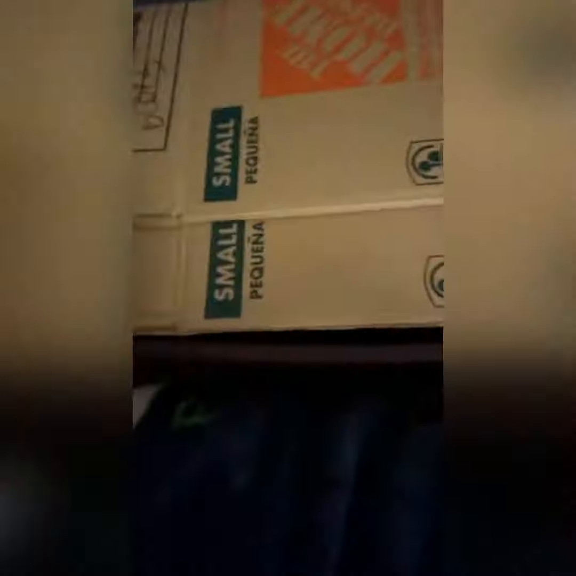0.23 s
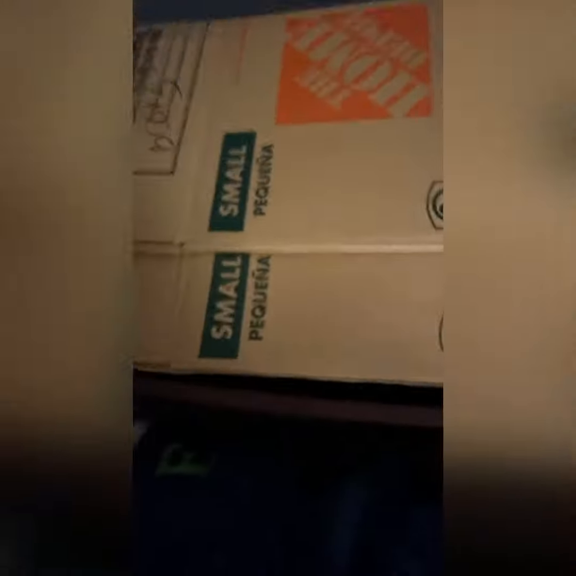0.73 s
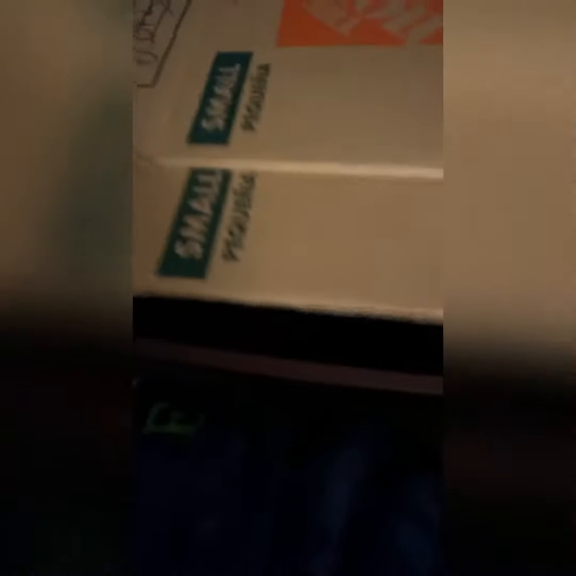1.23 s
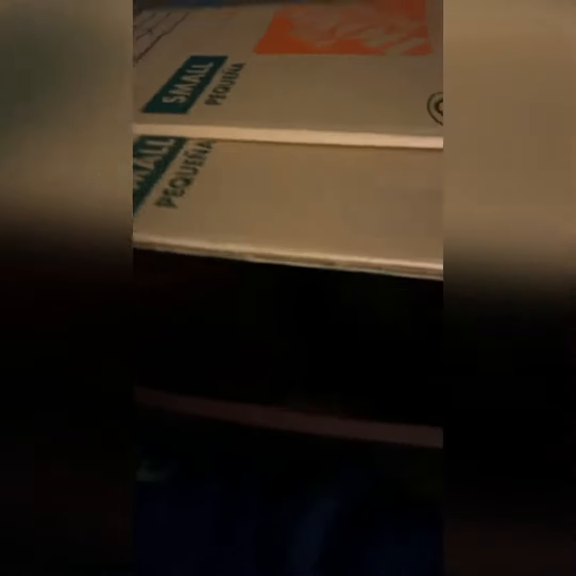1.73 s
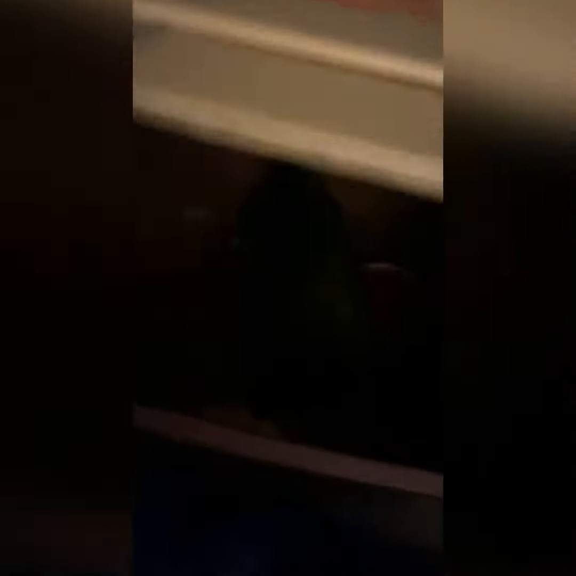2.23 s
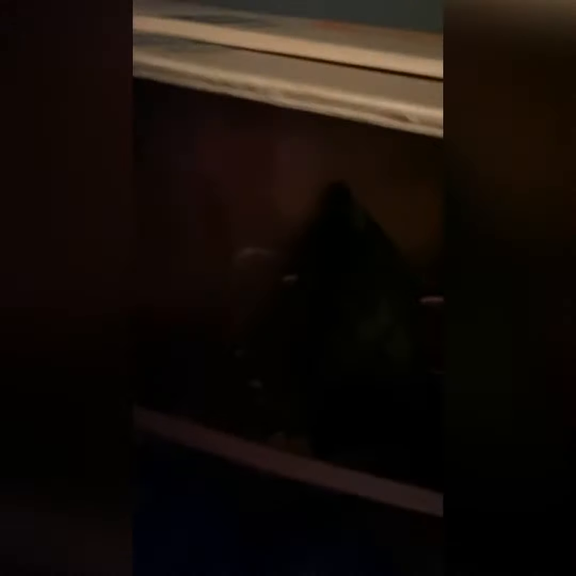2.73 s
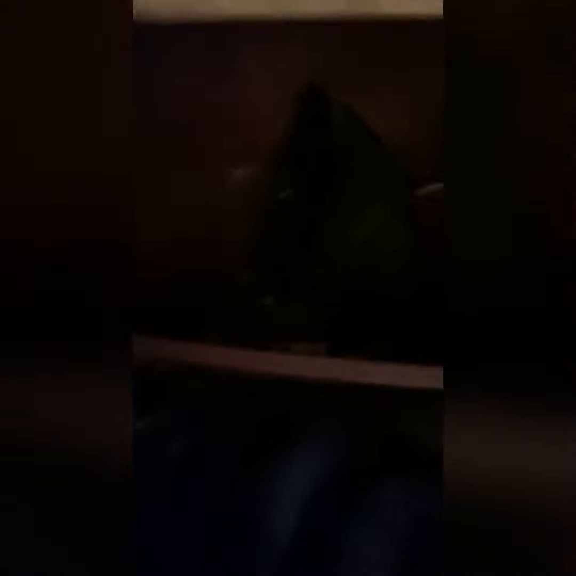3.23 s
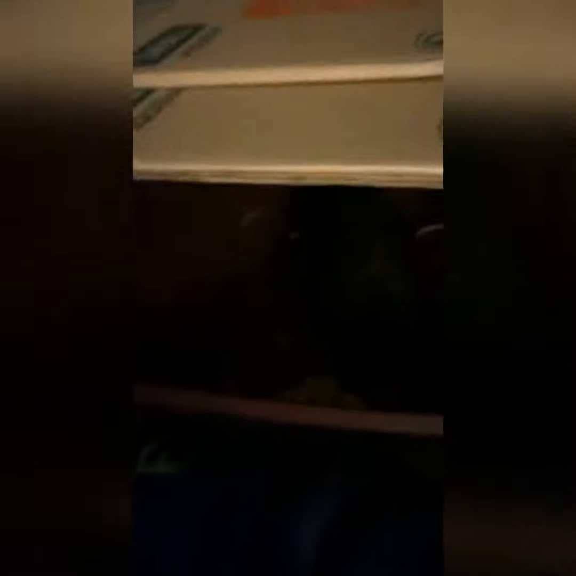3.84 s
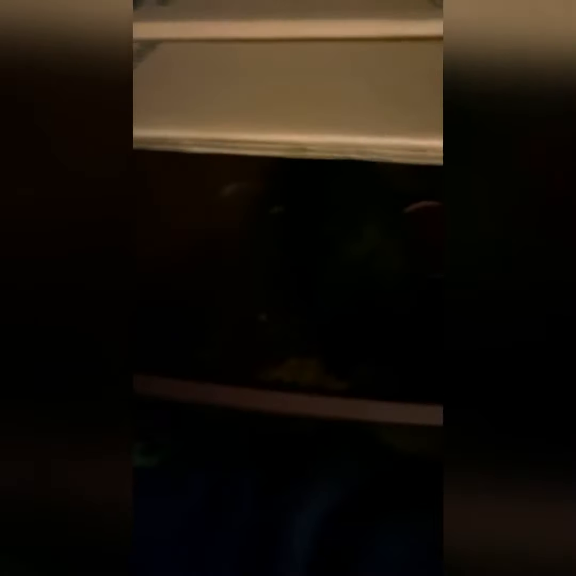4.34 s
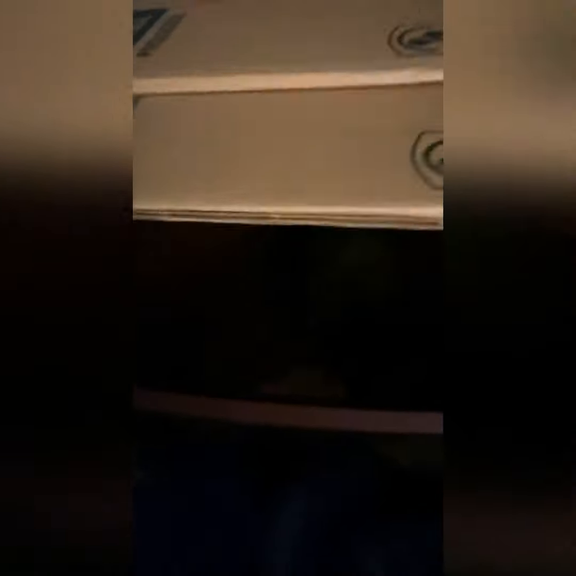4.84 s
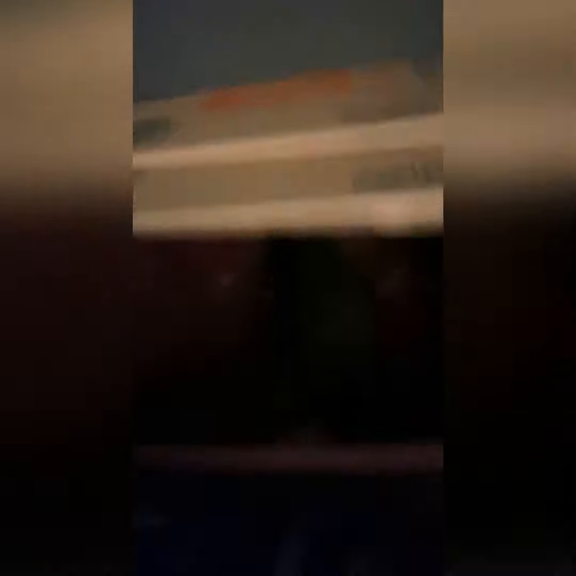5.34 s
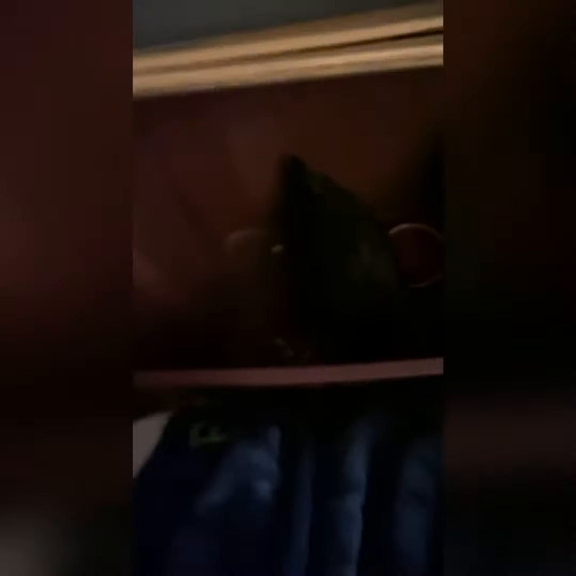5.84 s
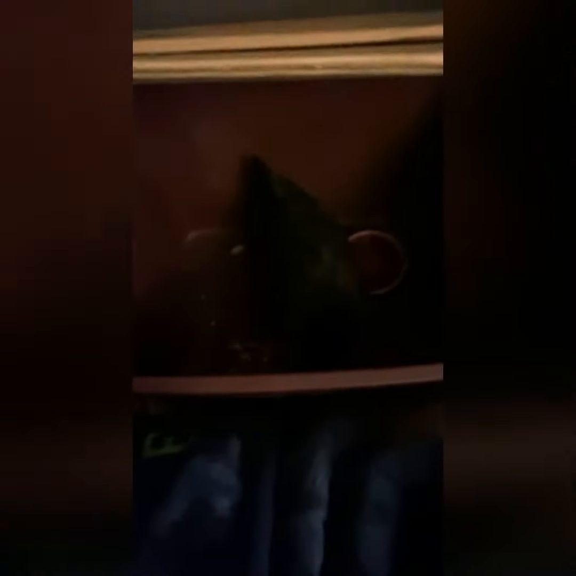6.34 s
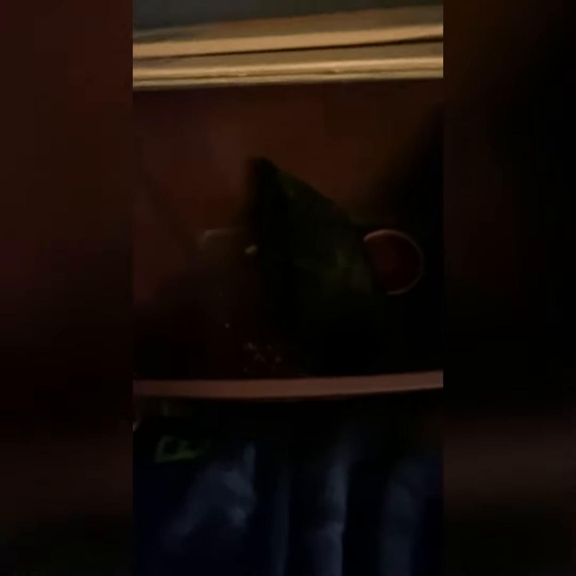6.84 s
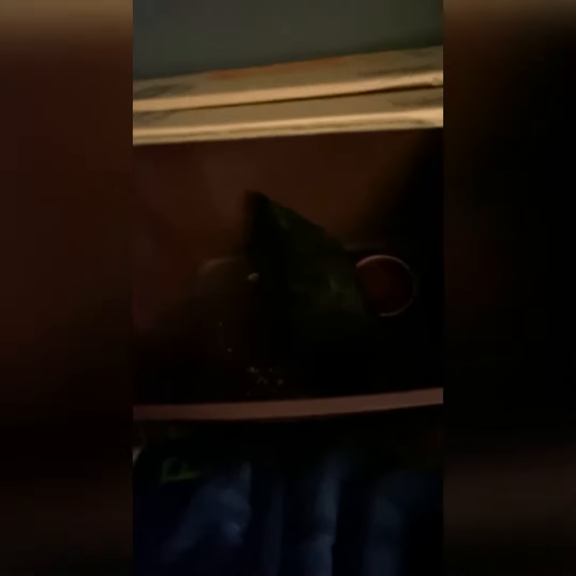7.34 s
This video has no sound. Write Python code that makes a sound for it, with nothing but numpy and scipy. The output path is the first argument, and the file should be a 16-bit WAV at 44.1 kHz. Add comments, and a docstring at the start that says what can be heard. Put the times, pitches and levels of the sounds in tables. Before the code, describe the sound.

Hen pecking feed from a plastic tub in irregular crunchy bursts, with faint peeps and dull knocks, while a low engine drones outside.

```python
"""Indoors, close to a hand-held phone, a hen pecks feed off the bottom of a plastic tub and peeps softly. Pecks
and scrapes are grainy noise bursts, the tub rings in decaying modes, seeds tick as short sines with clicks.
Peeps are gliding sines with a short tail from the tub walls; the hand bumps low and cloth rustles in noise
swells. An eight-cylinder engine outside drones low, a sum of sine orders that swell and sink at their own
levels. Banded noise and wavering low hums make the room air, one hum holding an engine order at a steady pitch;
the sound drops out briefly near the start."""
import sys
import numpy as np
from scipy import signal
from scipy.io import wavfile
from scipy.ndimage import uniform_filter1d

SR = 44100
rng = np.random.default_rng(int(sys.argv[2]) if len(sys.argv) > 2 else 0)


def waveform_to_disk(signal):
    """Save audio, clipped to [-1, 1], as 16-bit WAV at the path in sys.argv[1]."""
    frames = np.transpose(np.atleast_2d(signal))
    scaled = np.clip(frames, -1, 1) * 32767
    samples = np.round(scaled).astype(np.int16)
    wavfile.write(sys.argv[1], SR, samples)


N = 333837

# colour of the room air: pitch_hz [Hz], density_db [relative dB per Hz]
ROOM_COLOUR = [(15, -51), (25, -21), (41, -1), (64, 0), (78, -5), (87, -17.5), (127, -26.5), (145, -46),
               (195, -30), (229, -27), (545, -38.5), (591, -38.5), (988, -36), (2160, -47), (16000, -69)]
# narrow bands of noise in the room air: pitch_hz [Hz], width_hz [Hz], level_db [dB rms]
ROOM_BANDS = [(208, 30, -64), (390, 138, -64.5), (551.8, 10.3, -71), (764, 82, -82.5), (993, 36, -71),
              (1119, 16, -76.5), (1763, 41, -77), (1928, 43, -80.5)]
# steady low hums, before they waver: pitch_hz [Hz], level_db [dB rms]; the 110 Hz one is the engine's fifteenth
# order, held at one pitch
LOW_HUMS = [(102, -65.5), (110, -61), (120, -63.5)]
ROOM_AIR_DB = -56.5  # rms

# bumps of the hand on the phone: middle_s [s], length_s [s], level_db [dB]
HAND_BUMPS = [(.225, 0.058, -44), (.29, 0.054, -42.5), (.4, 0.081, -47), (.48, 0.062, -39.5),
              (.535, 0.054, -47), (.618, 0.037, -33), (.74, .08, -42), (.93, 0.093, -45),
              (1.025, 0.051, -38.5), (1.07, 0.066, -46), (1.166, .05, -44), (4.7, .1, -45), (5.2, .1, -39),
              (5.3, 0.071, -40.5), (5.38, .05, -46)]

# cloth and feathers, one row a movement: middle_s [s], length_s [s], bright_db [dB], middle_part_db [dB]
CLOTH_MOVES = [(.23, 0.073, -56, -60.5), (.3, 0.11, -59, -56.5), (.46, 0.044, -72, -74),
               (.555, 0.083, -60.5, -60), (.68, 0.14, -57.5, -60.5), (1.1, 0.51, -76.5, -73),
               (1.8, 0.49, -69, -69.5), (2.91, 0.22, -63.5, -69), (3.272, 0.049, -79, -94),
               (3.7, 0.13, -94, -71), (5.244, 0.53, -74, -72), (5.87, .1, -78, -68)]
# dull stirring in the tub: middle_s [s], length_s [s], stir_db [dB], boom_db [dB, near 350 Hz]
TUB_STIRS = [(.3, .3, -62, -61.5), (.65, 0.22, -64, -54.5), (1.66, .6, -63, -61.5), (2.71, .3, -66, -72),
             (3.69, 0.072, -47.5, -47.5), (5.12, 0.37, -62.5, -55), (5.76, 0.23, -59, -54.5),
             (5.83, 0.066, -49, -52.5), (7.2, 1.51, -63, -64)]
# grainy scratch: middle_s [s], length_s [s], level_db [dB]
GRAINY_SCRATCH = [(3.7, 0.12, -69.5)]
STIR_BED_DB, BOOM_BED_DB = -62.5, -67  # steady beds under the stirring swells

# single seed ticks: start_s [s], level_db [dB peak], pitch_hz [Hz], dull_db [dB over level_db]
SEED_TICKS = [(0.456, -54, 6000, 8), (0.647, -51, 3000, 8.5), (0.889, -63, 3000, 16.5),
              (1.7413, -41, 3600, -20), (1.976, -51, 2600, 0), (2.007, -57, 6000, -6),
              (2.117, -53, 7000, -12), (2.2047, -52, 3070, -8), (3.5327, -51, 5450, -13),
              (3.5327, -47, 3080, -15), (3.621, -46, 6120, -4), (3.6815, -38.5, 7840, 4),
              (3.775, -56, 8000, 8), (3.837, -61, 9200, -12), (3.905, -57, 6310, -6),
              (3.925, -54, 6420, -14), (4.0197, -50.5, 3560, -12), (4.812, -41, 3390, -4),
              (4.893, -43.5, 3860, -8), (5.238, -49, 3080, -12), (5.604, -44, 3845, -12),
              (6.0776, -45.5, 2911, 0), (6.612, -42, 5547, -19), (6.6607, -55, 8010, -15),
              (7.258, -55.5, 2603, 14), (7.268, -56, 2600, 14)]
TICK_T60_S = .0043

# peeps: start_s [s], length_s [s], first_pitch_hz [Hz], last_pitch_hz [Hz], flick_hz [Hz, added at the end],
# level_db [dB, before it trembles], octave_db [dB over the whistle]
HEN_PEEPS = [(0.472, 0.06, 1790, 1960, 110, -60, -38), (0.724, 0.053, 1890, 1910, 5, -58, -38),
             (0.906, 0.062, 1920, 1913, 20, -55, -32), (1.772, .048, 1660, 1800, 700, -61, -38),
             (2.063, .064, 1737, 1800, 280, -58.5, -27), (3.096, .058, 1713, 1705, 690, -58, -38),
             (3.543, 0.06, 1747, 1720, 380, -53, -36), (5.289, 0.076, 1911, 1776, 5, -53, -20),
             (5.463, 0.079, 2026, 1853, 5, -53, -19)]
GLIDE_EASE = 0.624  # under 1: the pitch moves most at the start
PEEP_ATTACK_S, PEEP_RELEASE_S, FLICK_S, FLICK_RISE_S = 0.013, 0.017, 0.021, 0.0106

# dull knocks on the tub wall: start_s [s], level_db [dB peak], contact_ms [ms]
WALL_KNOCKS = [(0.888, -26.5, 1.45), (2.05, -37.5, 2.9), (2.543, -31.5, 1.8), (2.561, -36, 2.1),
               (3.679, -46, 0.62), (4.21, -28, 1.34), (4.23, -35, 2.6), (4.558, -45, 0.83),
               (4.81, -44.5, 1.18), (4.89, -40.5, 1.4), (7.256, -43.5, 1.96)]
# modes of the free tub wall: pitch_hz [Hz], level_db [relative dB], t60_s [s]
WALL_MODES = [(117.5, -8, 0.18), (152, 2.5, 0.12), (183.6, 0.5, 0.08), (215.7, 8, 0.097),
              (254.6, -0.5, 0.07), (309, -2.5, 0.12), (390, -0.5, 0.043), (539, -3.5, 0.046),
              (665, 0, 0.022), (960, -11, 0.044), (1310, 5, 0.018)]
RING_SHARE = 0.65  # feed on the bottom shortens the ring of the free wall

# engine firing: time_s [s], firing_hz [firings per s], level_db [dB rms]
ENGINE_FIRING = [(1.2, 52.9, -44), (1.35, 56.2, -45), (1.45, 56.17, -36.5), (1.65, 57.98, -34),
                 (2.0, 60.67, -36), (2.26, 58.76, -39.5), (2.4, 58.92, -37), (2.9, 58.46, -35.5),
                 (3.27, 59.03, -35), (3.79, 60.6, -37.5), (4.0, 62.85, -43), (4.2, 65.42, -42.5),
                 (4.4, 66.4, -54), (4.7, 72.3, -46), (5.65, 88.56, -46), (6.03, 91.9, -46.5),
                 (6.31, 95.3, -52), (6.6, 97.36, -51.5), (7.2, 98.6, -45.5), (7.57, 104, -45.5)]
# fifth order of the cycle, a low drone that swells and then recedes: time_s [s], level_db [dB rms]
FIFTH_ORDER = [(5.2, -69), (5.4, -47), (5.7, -44.5), (6.0, -34.5), (6.5, -35), (6.8, -41), (7.1, -39.5),
               (7.57, -50)]
# the other orders: multiple of the cycle rate, level_db [dB, before load and walls]
OTHER_ORDERS = [(6, -52.5), (9, -66), (10, -57), (14, -65), (16, -57), (18, -66), (20, -68)]
# level of the other orders: time_s [s], level_db [dB]
ENGINE_LOAD = [(1.2, -14.5), (4.5, -9.5), (6.0, -3.5), (7.5, -3)]
# what the walls let through of the other orders: pitch_hz [Hz], gain_db [dB]
WALL_PASS = [(40, -11), (70, 5), (90, -14), (110, 7), (122, 6.5), (132, -27), (170, -3), (200, -7),
             (260, -3)]

# pecks: start_s [s], crack_db [dB peak], crunch_db [dB over crack], tub_db [dB over crack],
# colour_hz [Hz, of the crack], spot_hz [Hz, of the struck spot]
BEAK_PECKS = [(0.9234, -47.5, 0, -0.5, 7460, 1910), (2.0921, -50, 3, -16, 7930, 1790),
              (2.1218, -45, 0.5, -13, 11200, 1760), (2.1577, -48, -1, -18, 9920, 867),
              (2.5327, -30, 1, 6.5, 10100, 1180), (2.583, -44.5, 3, -1, 6910, 1210),
              (2.5934, -49, 7, -8, 6370, 2280), (2.6265, -59.5, 11, 7, 6430, 840),
              (2.6787, -43.5, 8.5, 2, 6240, 856), (2.6861, -41.5, 10, -4, 6600, 2050),
              (4.1979, -38, -18, 8, 5950, 1050), (4.2021, -31.5, 3.5, 4.5, 6410, 1350),
              (4.289, -44.5, -2.5, -4, 10500, 2280), (4.3738, -42.5, -3, -5, 10240, 1306),
              (4.3993, -39.5, -1, -8, 10220, 1420), (4.4852, -42.5, -3, -9, 9880, 813),
              (4.8488, -47.5, -11, -1, 9600, 1990), (4.9287, -46, -4, -19, 10050, 964),
              (6.6221, -44, 6.5, 10.5, 7020, 1114), (6.6265, -55, -6, 15, 7130, 1170),
              (6.716, -35.5, -4.5, -14, 9500, 1890), (6.7815, -21, -21, -12, 8000, 1280),
              (6.827, -31, -27, -15, 7700, 807)]
# tub ring under the pecks: pitch_hz [Hz], level_db [dB, before the struck spot's favour], t60_s [s]
TUB_MODES = [(800, 0, 0.012), (940, -28.5, 0.023), (1163, -2, 0.017), (1330, 8.5, 0.013), (1785, -3, 0.032),
             (2210, 0.5, 0.03)]
PECK_RISE_MS, PECK_T60_S = 1, 0.041

# beak or claw dragged through feed: start_s [s], level_db [dB peak], low_db [dB over level_db], t60_s [s]
FEED_SCRAPES = [(2.517, -59.5, 12.5, 0.31), (2.671, -52.5, 5, 0.11), (4.57, -57, -7, 0.11),
                (5.8757, -51.5, -13, 0.14), (5.972, -59, -7, 0.062), (6.121, -56.5, -4, 0.2),
                (6.1664, -53, 1.5, 0.11), (6.398, -55, -12, 0.19), (6.673, -48, 0, 0.18),
                (6.8958, -46, -1.5, 0.16), (7.0851, -52, -12, 0.19), (7.183, -44, -16, 0.13),
                (7.262, -60, 12.5, 0.16), (7.3605, -63, 10.5, 0.14), (7.4515, -51.5, -9, 0.39)]

SILENCE_START_S, SILENCE_END_S = 0.0186, 0.1827
TOP_HZ = 15900


def undb(db):
    """Decibels to gain."""
    return 10 ** (np.asarray(db) / 20)


def level(x, db):
    """Scale to an rms level."""
    return x * undb(db) / np.sqrt(np.mean(x ** 2))


def curve(rows, off=None):
    """Columns of a table joined by straight lines in time; off is the value outside the rows."""
    s, *columns = np.transpose(rows)
    return [np.interp(np.arange(N) / SR, s, c, left=off, right=off) for c in columns]


def band(lo_hz, hi_hz, x):
    """Band-pass."""
    return signal.sosfilt(signal.butter(2, [lo_hz, min(hi_hz, .45 * SR)], "bandpass", fs=SR, output="sos"), x)


def walk(rate):
    """Slow random drift: levels held for 1 / rate seconds, then slewed twice."""
    k = int(SR / rate)
    held = np.repeat(rng.standard_normal(N // k + 1), k)
    return 1.043 * uniform_filter1d(uniform_filter1d(held, k), k)[:N]


def fade(t, t60):
    """Exponential decay, 60 dB in t60 seconds (2 ms at least)."""
    return np.exp(-np.log(1000) * t / max(t60, .002))


def add(out, s, x, db):
    """Place a sound at time s with a peak level."""
    i = int(s * SR)
    x = x[:N - i]
    out[i:i + len(x)] += x * undb(db) / np.abs(x).max()


def ring(x, modes):
    """A blow convolved with decaying modes."""
    t = np.arange(4096) / SR
    body = sum(undb(db) * np.sin(2 * np.pi * hz * t) * fade(t, t60) for hz, db, t60 in modes)
    return signal.fftconvolve(x, body)[:len(x)]


def swells(rows, flat):
    """Summed gains of sounds that swell and sink about their middle; a larger flat holds the top longer."""
    t = np.arange(N) / SR
    return sum(undb(dbs)[:, None] * np.exp(-np.abs(2 * (t - s) / length) ** flat)
               for s, length, *dbs in rows)


def room():
    """Steady indoor air: half-octave bands that flicker, narrow bands and low hums wavering in pitch and level."""
    air = 0
    colour_hz, colour_db = np.transpose(ROOM_COLOUR)
    for hz in 90 * 2 ** np.arange(0, 8, .5):
        db = np.interp(np.log(hz), np.log(colour_hz), colour_db) + 3.7 * walk(6)
        air = air + undb(db) * band(hz / 1.248, hz * 1.183, rng.standard_normal(N))
    low_air = band(33, 106, rng.standard_normal(N))
    out = level(air, ROOM_AIR_DB) + level(low_air, -60.5)
    for hz, width, db in ROOM_BANDS:
        out += level(band(hz - width / 2, hz + width / 2, rng.standard_normal(N)), db)
    for hz, db in LOW_HUMS:
        gain = np.sqrt(2) * undb(db + 3.4 * walk(8.3))
        phase = 2 * np.pi * np.cumsum(hz * (1 + 0.01044 * walk(4.4))) / SR
        out += gain * np.sin(phase)
    return out


def handling():
    """Low bumps of the hand that holds the phone: the case wobbles at a wandering pitch."""
    wobble = np.sin(2 * np.pi * np.cumsum(62 * (1 + 0.084 * walk(14))) / SR)
    rumble = band(44, 75.5, rng.standard_normal(N))
    rub = band(65, 216, rng.standard_normal(N))
    bumps = level(wobble, -1.1) + level(rumble, -4.5) + level(rub, -14)
    return bumps * (undb(-62.5) + swells(HAND_BUMPS, flat=1.84)[0])


def rustle():
    """Fine grains of rubbing cloth: a bright part near 10 kHz, a middle part, a scratch and a dull stir."""
    bright_gain, mid_gain = undb(-79.5) + swells(CLOTH_MOVES, flat=2.4)
    stir_gain, boom_gain = undb([[STIR_BED_DB], [BOOM_BED_DB]]) + swells(TUB_STIRS, flat=0.96)
    scratch_gain = swells(GRAINY_SCRATCH, flat=3.9)[0]
    # all the parts share one grain
    bright, mid, dull, rough, boom = rng.standard_normal((5, N)) * undb(1.86 * walk(300))

    bright = band(6000, 18300, bright) + .5 * band(9200, 11500, bright)
    mid = band(960, 5540, mid)
    scratch = band(5400, 5900, rough) + 1.7 * band(2300, 2800, rough) + 0.33 * band(7100, 8200, rough)
    scratch = scratch * undb(3.0 * walk(120))
    stir = band(417, 965, dull) + 0.31 * band(610, 2250, dull)
    boom = band(272, 400, boom)

    out = bright_gain * level(bright, -0.42) + mid_gain * level(mid, 0.053)
    out += scratch_gain * level(scratch, 2)
    out += stir_gain * undb(2.0 * walk(70)) * level(stir, -6.0)
    return out + boom_gain * level(boom, -1.95)


def ticks():
    """A seed snaps against plastic: a cycle or two over a wide click, with a dull tap under it."""
    out, t = np.zeros(N), np.arange(1024) / SR
    for s, db, hz, dull_db in SEED_TICKS:
        noise = rng.standard_normal((2, len(t)))
        click = band(.5 * hz, 1.96 * hz, noise[0] * fade(t, 0.0032))
        click = click + 0.15 * band(1800, 12000, noise[0] * fade(t, 0.0027))
        snap = np.sin(2 * np.pi * hz * t) * fade(t, TICK_T60_S) * (1 - np.exp(-t / .0001))
        add(out, s, snap + 0.51 * click, db)
        add(out, s, band(400, 1860, noise[1] * fade(t, 0.018)), db + dull_db)
    return out


def peeps():
    """Short, hoarse whistles that glide and may flick up at the end; some carry a faint, broken octave."""
    out, t = np.zeros(N), np.arange(N) / SR
    flutter = undb(3.0 * walk(60))
    waver = 1 + 0.0117 * walk(200)
    for s, length, first_hz, last_hz, flick_hz, db, octave_db in HEN_PEEPS:
        end = s + length
        glide = np.clip((t - s) / length, 0, 1) ** GLIDE_EASE
        flick = np.clip((t - end + FLICK_S) / FLICK_RISE_S, 0, 1)
        hz = first_hz + (last_hz - first_hz) * glide + flick_hz * flick
        phase = 2 * np.pi * np.cumsum(hz * waver) / SR
        gain = np.clip((t - s) / PEEP_ATTACK_S, 0, 1) * np.clip((end - t) / PEEP_RELEASE_S, 0, 1)
        whistle = np.sin(phase) + undb(octave_db) * flutter * np.sin(2 * phase)
        out += np.sqrt(2) * undb(db) * gain * whistle
    hoarse = undb(2.0 * walk(120)) + 0.36 * walk(900)
    return out * hoarse


def tub_air(x):
    """The tub's walls throw the voice back in a short, dense tail."""
    t = np.arange(4096) / SR
    tail = rng.standard_normal(len(t)) * fade(t, 0.068)
    return x + undb(-2) * signal.fftconvolve(x, tail / np.sqrt(np.sum(tail ** 2)))[:N]


def thuds():
    """A soft push flexes the wall; every blow lands on another spot; bending waves bring the low modes late."""
    out, t = np.zeros(N), np.arange(8192) / SR
    for s, db, contact_ms in WALL_KNOCKS:
        push = np.hanning(int(max(contact_ms, .3) * SR / 1000))
        wall = 0
        spot = rng.standard_normal((len(WALL_MODES), 2))  # random level and phase of each mode
        for (hz, mode_db, t60), (spot_level, spot_phase) in zip(WALL_MODES, spot):
            since = np.maximum(t - (0.0963 / np.sqrt(hz) - .0025), 0)  # slower waves arrive later
            gain = undb(mode_db + 3.2 * spot_level) * fade(since, RING_SHARE * t60)
            onset = 1 - np.exp(-since * hz / 0.32)
            wall = wall + gain * onset * np.sin(2 * np.pi * hz * since + 0.47 * spot_phase)
        add(out, s, signal.fftconvolve(push, wall), db)
    return out


def engine():
    """Orders of the eight-cylinder cycle; uneven firing feeds those between the firing tones."""
    t = np.arange(N) / SR
    firing_hz, firing_db = curve(ENGINE_FIRING)
    cycle_hz = firing_hz / 8  # eight firings a cycle
    cycle = 2 * np.pi * np.cumsum(cycle_hz) / SR
    out = undb(firing_db + .6 * walk(6)) * np.sin(8 * cycle)
    fifth_db = curve(FIFTH_ORDER, off=-90)[0]
    out += undb(fifth_db + .6 * walk(6)) * np.sin(5 * cycle)

    pass_hz, pass_db = np.transpose(WALL_PASS)
    load_db = curve(ENGINE_LOAD)[0]
    for order, order_db in OTHER_ORDERS:
        n = round(order)
        through_db = np.interp(n * cycle_hz, pass_hz, pass_db)
        gain = undb(order_db + through_db + load_db + 5.8 * walk(2.96))
        out += gain * np.sin(n * cycle + rng.uniform(0, 2 * np.pi))
    fade_in = np.clip((t - .9) / 0.39, 0, 1)
    return np.sqrt(2) * fade_in * out


def pecks():
    """Each peck is a quick crunch of beak and seeds: a bright crack, and the tub rings under it."""
    out, t = np.zeros(N), np.arange(8192) / SR
    rise = 1 - np.exp(-1000 * t / PECK_RISE_MS)
    shape = rise * (fade(t, PECK_T60_S) + undb(-19) * fade(t, 0.16))
    for s, db, mid_db, tub_db, hz, spot_hz in BEAK_PECKS:
        noise = rng.standard_normal((4, len(t)))
        grain_db = 2.2 * uniform_filter1d(noise[1], size=24) * np.sqrt(24)
        crunch = noise[0] * undb(grain_db) * shape

        crack = band(3560, 14300, band(2580, 12000, crunch)) + 0.71 * band(0.853 * hz, 1.02 * hz, crunch)
        crack = crack + 0.32 * band(12500, 20000, crunch * fade(t, 0.1))
        add(out, s, crack, db)
        mid = band(1880, 5550, crunch) + 0.75 * band(2450, 2760, noise[2] * shape)
        add(out, s, mid, db + mid_db)
        # the struck spot favours the modes near its own pitch: 7 dB lost an octave away
        modes = [(f, d - 7.0 * abs(np.log2(f / spot_hz)), t60) for f, d, t60 in TUB_MODES]
        add(out, s, ring(noise[3] * shape * fade(t, 1.0), modes), db + tub_db)
    return out


def scrapes():
    """Beak or claw drags through feed: gritty swishes that rise over a few milliseconds and trail off."""
    out, t = np.zeros(N), np.arange(8192) / SR
    for s, db, low_db, t60 in FEED_SCRAPES:
        noise = rng.standard_normal((2, len(t)))
        grain_db = 2.0 * uniform_filter1d(noise[1], size=40) * np.sqrt(40)
        grit = noise[0] * undb(grain_db) * (1 - np.exp(-t / 0.0019)) * fade(t, t60)
        add(out, s, band(2600, 10100, grit) + 0.41 * band(8800, 16200, grit), db)
        add(out, s, band(1500, 4900, grit), db + low_db)
    return out


def scene():
    """Everything at one microphone."""
    hen = ticks() + tub_air(peeps()) + thuds() + pecks() + scrapes()
    return (room() + handling() + rustle() + engine() + hen)[None]


def record(dry):
    """The sound drops out briefly near the start, and a steep low-pass cuts the top."""
    t = np.arange(N) / SR
    fade_out = np.clip((SILENCE_START_S - t) / 0.0034, 0, 1)
    fade_in = np.clip((t - SILENCE_END_S) / 0.012, 0, 1)
    low_pass = signal.ellip(10, .2, 70, TOP_HZ, fs=SR, output="sos")
    return signal.sosfilt(low_pass, dry * (fade_out + fade_in))


dry = scene()
out = record(dry)
waveform_to_disk(out)
```